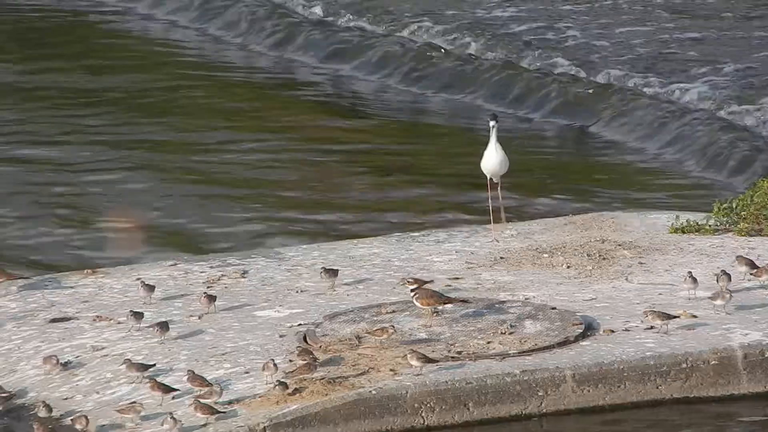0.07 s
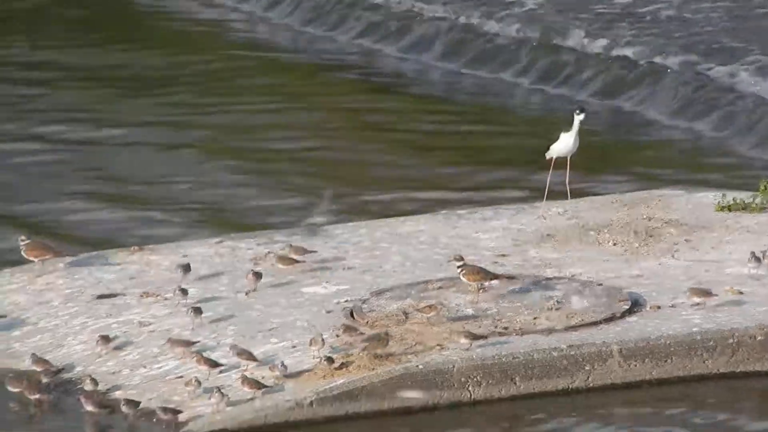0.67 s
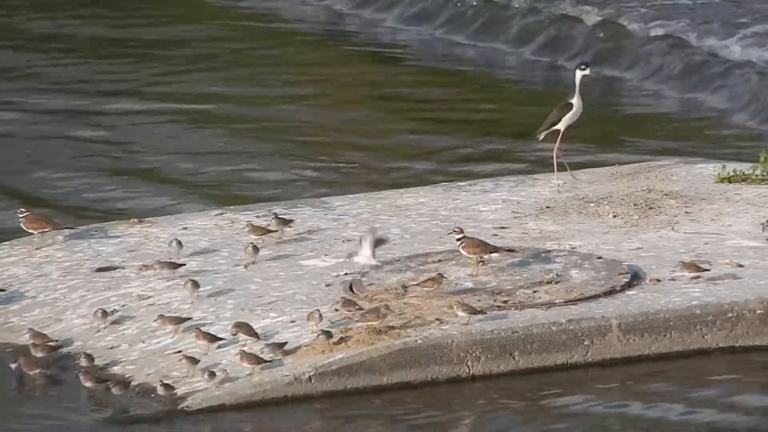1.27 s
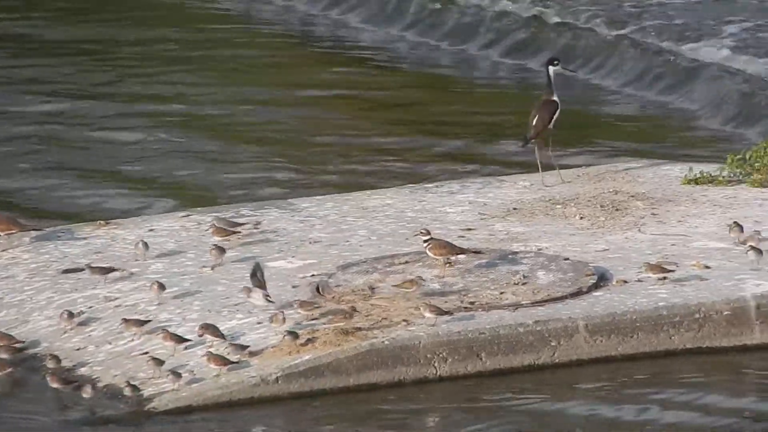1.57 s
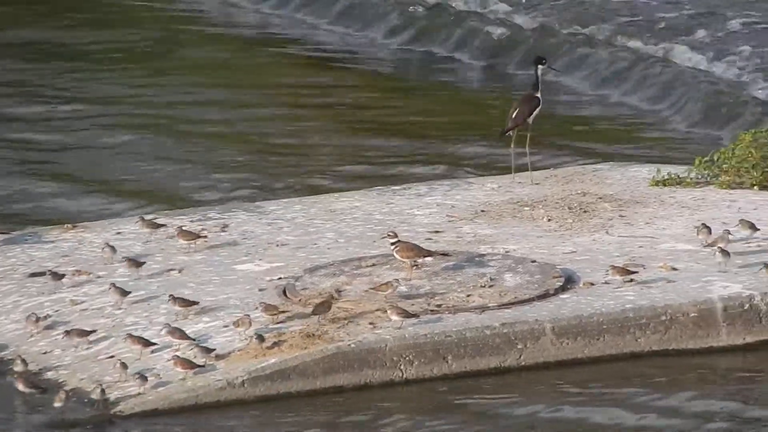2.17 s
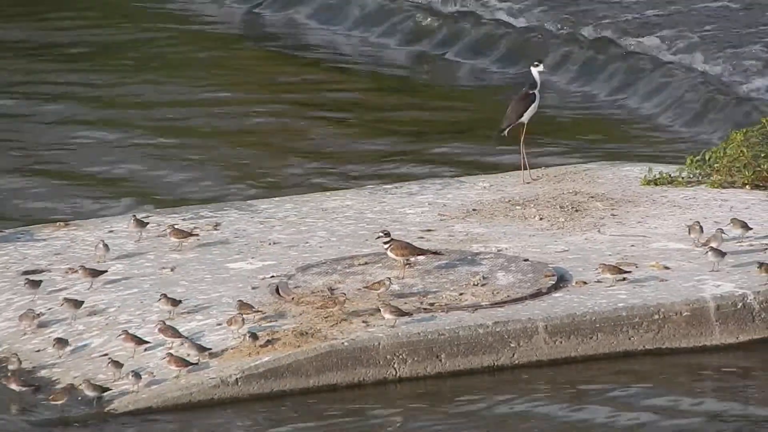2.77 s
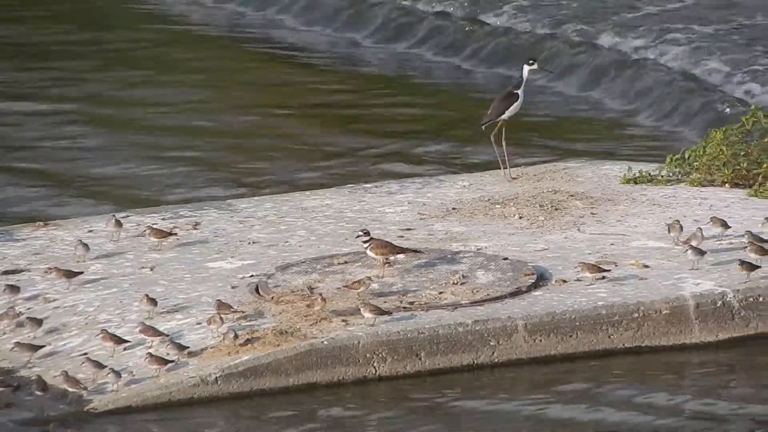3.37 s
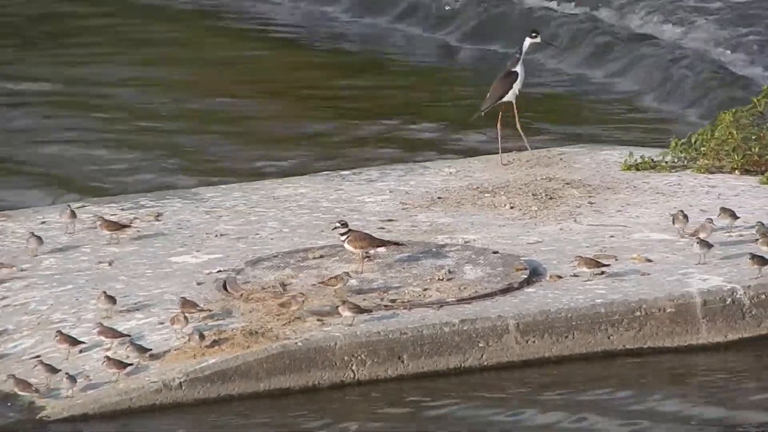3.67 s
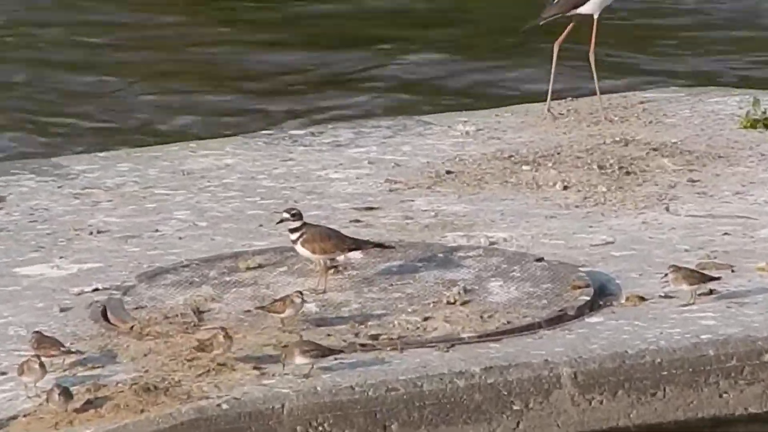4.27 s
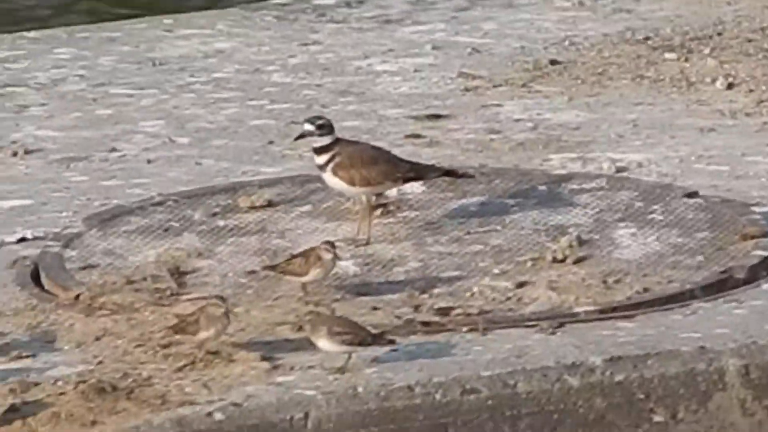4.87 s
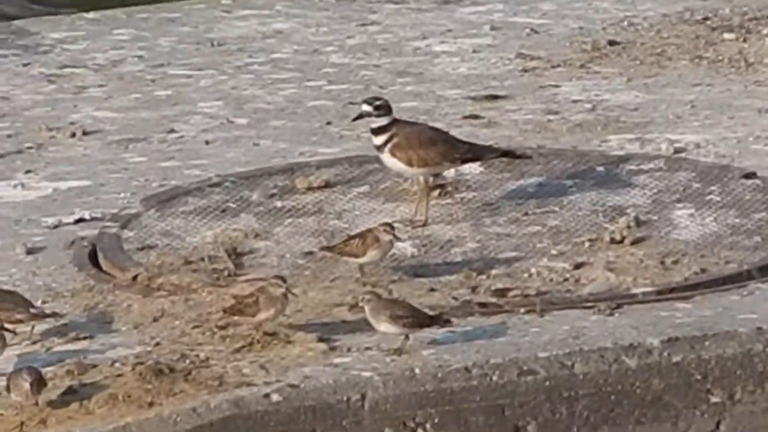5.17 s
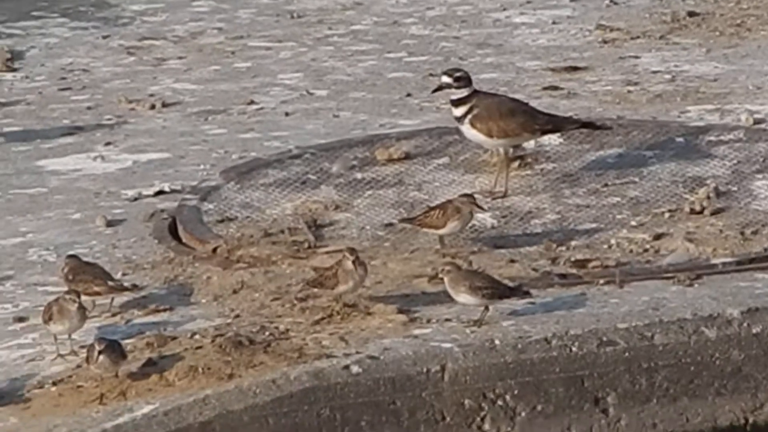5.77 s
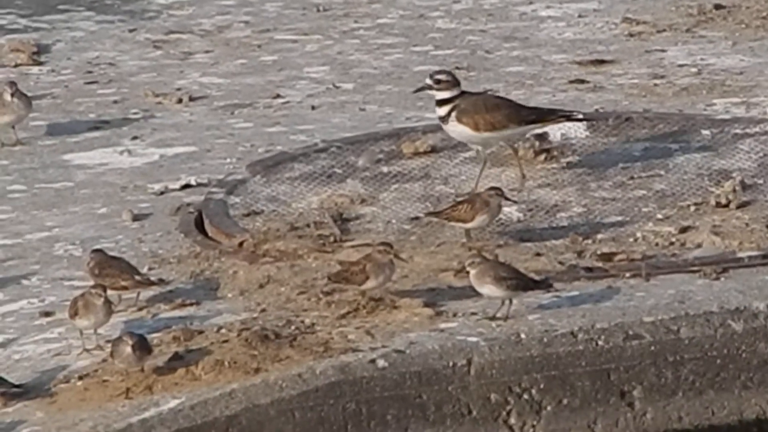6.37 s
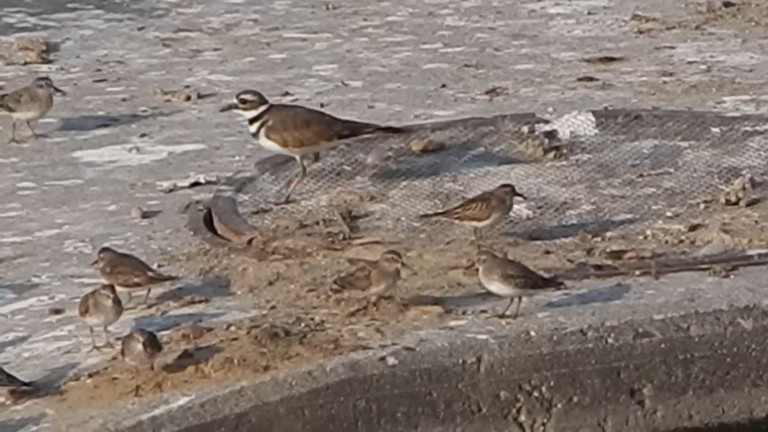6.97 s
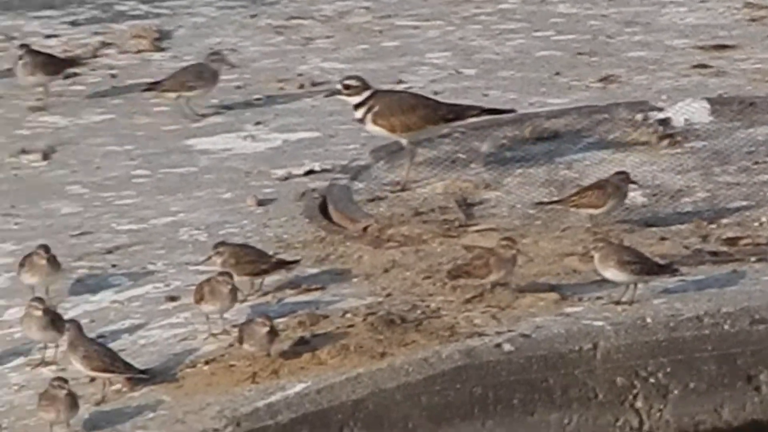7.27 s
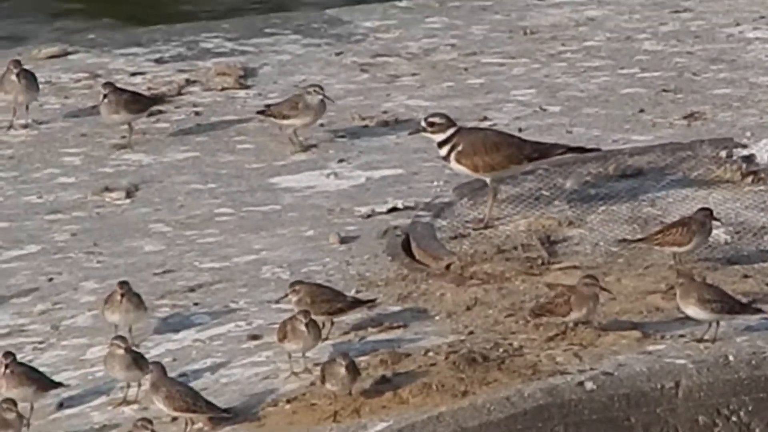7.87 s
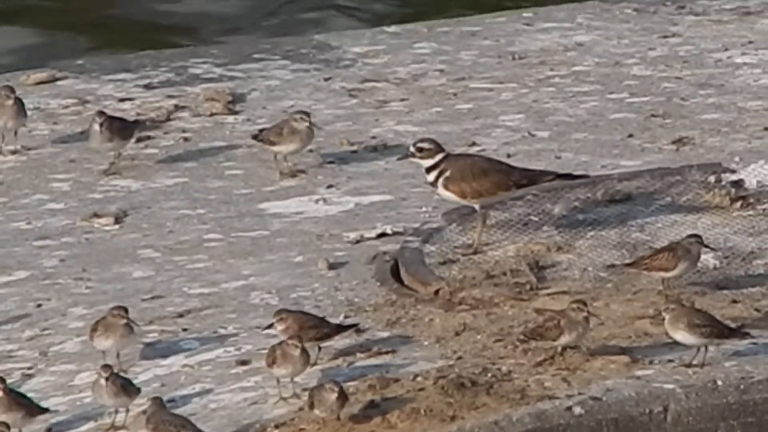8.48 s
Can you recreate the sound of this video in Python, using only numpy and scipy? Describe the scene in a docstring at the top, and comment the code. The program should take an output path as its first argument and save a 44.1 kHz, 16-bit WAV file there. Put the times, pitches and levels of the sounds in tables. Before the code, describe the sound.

River water roars and bubbles steadily over a low weir, with a fine hiss on top and distant traffic rumbling underneath. A truck drones past early, then car engines hum by while small shorebirds give a few faint, high chips. About halfway, the handled camera makes one sharp click on the right, and everything drops in volume for a moment before swelling back.

```python
"""River weir near a road

Water roars and bubbles over a low weir. Traffic rumbles beyond it and a fine hiss lies on top.
A truck drones past, car engines slow down and pull away, and small shorebirds chip faintly.
A camera is handled: its body ticks softly, then gives one sharp click that makes its
automatic volume control turn everything down for a moment."""
import sys
import numpy as np
from scipy import signal
from scipy.fft import rfft, irfft
from scipy.io import wavfile
from scipy.ndimage import uniform_filter1d

SR = 44100
rng = np.random.default_rng(int(sys.argv[2]) if len(sys.argv) > 2 else 0)


def to_wav(sig):
    """Store sig (one row per channel, or 1-D mono) as 16-bit WAV at the path in sys.argv[1].

    Samples outside -1..1 are clipped; the rate is SR.
    """
    pcm = np.clip(np.atleast_2d(sig), -1, 1) * 32767
    pcm = np.round(pcm).astype(np.int16)
    wavfile.write(sys.argv[1], SR, pcm.T)  # frames by channels


N = 375291
TIME = np.arange(N) / SR

# How strong each noise is from low to high: frequency_hz, relative_db
WEIR_SPECTRUM = [(280, -9), (480, -4), (562, -7.5), (795, -0.5), (1270, -2), (1970, -9), (2310, -14.5),
                 (2500, -14.5), (2670, -16.5), (4230, -27.5), (7000, -40.5), (9100, -58), (15400, -120)]
TRAFFIC_SPECTRUM = [(12, -50), (28, -39), (45, -8.5), (65, -6.5), (97, 0.5), (130, -2.5), (189, -6),
                    (233, -10), (287, -21.5), (321, -19.5), (358, -13), (379, -11), (418, -10.5),
                    (560, -22), (730, -27), (1230, -120)]
HISS_SPECTRUM = [(3240, -2), (5500, -2), (7320, 0), (8560, 0.5), (11000, 0.5), (11800, -2.5), (15500, -16)]
# Moments when each noise grows a little louder: peak_s, half_width_s, rise_db
WEIR_RISES = [(0.35, 0.24, 1.2), (1.3, 1.0, 0.76), (7.3, 1.0, 0.9)]
TRAFFIC_RISES = [(1.0, 1.7, 1.5), (5.3, 0.19, 0.83), (8.3, .35, 1.7)]
HISS_RISES = [(1.4, 1.4, 2.5), (6.5, 0.62, 4.6), (7.8, 3.7, 2.4)]
# How alike the noise is on the left and right: frequency_hz, likeness (1 is alike, 0 is unrelated)
STEREO_LIKENESS = [(60, 0.97), (140, 1), (340, 0.93), (860, 0.82), (1380, 0.55), (1900, 0.28),
                   (2900, -0.01), (4000, -0.32), (5500, -0.26), (9000, -0.041)]
# Which side the noise is louder on: frequency_hz, left_minus_right_db
STEREO_BALANCE = [(100, -1), (1500, -0.64), (4500, -1.4), (8000, -2), (14000, -2)]
# The tones in an engine's hum: multiple_of_firing_rate, relative_db
TRUCK_HARMONICS = [(2, -1.5), (3, -1), (4, -3.5), (5, -4.5), (7, 1.5), (8, -7.5), (9, -6)]
CAR_HARMONICS = [(1, 0), (2, -25)]
# Passing cars: start_s, end_s, first_hz, last_hz, loudest_s, level_db, half_width_s, wobble_share
CAR_PASSES = [(0.5, 2.5, 96.6, 105.8, 1.97, -22.5, 0.23, 0.031),
              (2.8, 4.4, 159, 131.6, 2.75, -29, 0.46, 0.011),
              (3.6, 4.6, 99.8, 109.7, 4.3, -23, 0.35, 0.032),
              (4.9, 6.8, 129.2, 157.3, 6.31, -17.5, 0.4, 0.0027),
              (6.5, 7.9, 356.1, 358.5, 7.3, -34.5, .6, 0.0028)]
# Short shorebird calls: time_s, relative_db, strongest_harmonic_hz
BIRD_CHIPS = [(2.805, -41, 5070), (3.6456, -42, 5110), (5.2734, -38, 4650), (5.9668, -38, 5000),
              (6.8613, -39, 5110), (7.3694, -40, 5170)]
# Clicks of the handled camera: start_s, right_db, right_minus_left_db, brightness_db_per_octave
CAMERA_CLICKS = [(3.4167, -20.5, 6, 2), (3.429, -28, 4, 4), (4.5724, -1.5, 10, 1), (4.575, -12, 9, 3)]
# The tones the camera body rings with: pitch_hz, relative_db, ring_s (time to fade by 60 dB)
CAMERA_TONES = [(1880, -5, .03), (2170, -2, 0.012), (3070, -3.5, 0.013), (4100, -6, .01),
                (7400, -13.5, .01), (9400, -13, .008), (10700, -5.5, 0.0053), (11900, -4, 0.0058),
                (14400, -21, .005)]


def gain_of(db):
    """Turn decibels into a number to multiply a sound by."""
    return 10 ** (np.asarray(db) / 20)


def unit_level(x):
    """Scale a signal so its average strength (rms) is 1."""
    return x / np.sqrt(np.mean(x ** 2) + 1e-20)


def look_up(table, hz):
    """Read between a table's rows, giving each octave equal room."""
    row_hz, values = np.transpose(table)
    return np.interp(np.log(hz + 1), np.log(row_hz + 1), values)


def add(mix, start_s, sound):
    """Add a stereo sound to the mix at the given time."""
    part = mix[:, round(start_s * SR):][:, :sound.shape[1]]
    part += sound[:, :part.shape[1]]


def drift(rate_hz):
    """A smooth random curve that changes about rate_hz times a second."""
    hz = np.fft.rfftfreq(N, 1 / SR)
    return unit_level(irfft(rfft(rng.standard_normal(N)) * np.exp(-(hz / rate_hz) ** 2), N))


def swelling(rises, base_db):
    """Volume over time: a steady level with a few smooth rises."""
    rise_db = sum(db * np.exp(-((TIME - peak_s) / width_s) ** 2) for peak_s, width_s, db in rises)
    return gain_of(base_db + rise_db)


def wide_noise(spectrum, patchy_db, flicker_db, frame_size):
    """Stereo noise whose level wavers, both in small patches of frequency and as a whole."""
    hz = np.fft.rfftfreq(frame_size, 1 / SR)
    hop = frame_size // 4
    frames = N // hop + 5
    a, b, c, d, patches = rng.standard_normal((5, frames, len(hz)))
    patches = uniform_filter1d(patches, size=10, axis=0)
    patches = unit_level(uniform_filter1d(patches, size=7, axis=1))
    flicker = unit_level(uniform_filter1d(rng.standard_normal((frames, 1)), size=6, axis=0))
    likeness = np.clip(look_up(STEREO_LIKENESS, hz), -1, 1)
    left, unrelated = a + 1j * b, c + 1j * d
    right = likeness * left + np.sqrt(1 - likeness ** 2) * unrelated
    right /= gain_of(look_up(STEREO_BALANCE, hz))
    shape_db = look_up(spectrum, hz) + patchy_db * patches + flicker_db * flicker
    bands = np.array([left, right]) * gain_of(shape_db)
    _, noise = signal.istft(bands.transpose(0, 2, 1), nperseg=frame_size, noverlap=frame_size - hop)
    return noise[:, :N] / np.std(noise[:, :N].mean(0))


def weir():
    """Falling water blends into a roar, with single bubbles ringing in it."""
    roar = wide_noise(WEIR_SPECTRUM, patchy_db=0.78, flicker_db=0.33, frame_size=1024)
    fizz = bubbles(per_s=980, spread_db=1.5, db_per_octave=-4.5, cycles=11.5) * gain_of(-20.4)
    return (roar + fizz) * swelling(WEIR_RISES, base_db=-23.5)


def bubbles(per_s, spread_db, db_per_octave, cycles):
    """Each bubble rings briefly and rises in pitch; the small, high ones are the faintest."""
    out, pitches = np.zeros((2, N)), np.geomspace(700, 5500, 24)
    count = int(per_s * N / SR / len(pitches))
    for hz in pitches:
        turns = np.arange(int(3 * cycles * SR / hz)) * hz / SR
        fade = np.exp(-2 * turns / cycles) * (1 - np.exp(-turns))
        ring = np.sin(2 * np.pi * turns * (1 + 0.042 * turns / cycles)) * fade
        when, side, chance = rng.random((count, 3)).T
        extra_db = spread_db * np.minimum(-np.log(1 - chance), 4)
        strength = gain_of(extra_db + db_per_octave * np.log2(hz / pitches[0]))
        starts = np.zeros((2, N))
        starts[:, (when * (N - 1)).astype(int)] = strength * np.sqrt([1 - side, side])
        out += signal.oaconvolve(starts, ring[None], axes=1)[:, :N]  # one ring at every start
    return unit_level(out)


def traffic():
    """Many distant vehicles blend into one low rumble."""
    rumble = wide_noise(TRAFFIC_SPECTRUM, patchy_db=1.0, flicker_db=1.1, frame_size=4096)
    rumble *= swelling(TRAFFIC_RISES, base_db=-22)
    return signal.sosfilt(signal.butter(4, 38, "high", fs=SR, output="sos"), rumble)


def hiss():
    """A faint, fine hiss that slowly swells and sinks."""
    noise = wide_noise(HISS_SPECTRUM, patchy_db=1.5, flicker_db=0.63, frame_size=1024)
    return noise * swelling(HISS_RISES, base_db=-51.5)


def engine(firing_hz, harmonics, waver_db, wobble):
    """An exhaust hums at multiples of the engine's firing rate, each tone wavering on its way."""
    turns = np.cumsum(firing_hz * (1 + wobble * drift(16.2))) / SR
    hum = np.zeros(N)
    for multiple, db in harmonics:
        strength = gain_of(db + waver_db * drift(2.7))
        hum += strength * np.sin(2 * np.pi * (multiple * turns + rng.random()))
    return np.sqrt(2) * hum


def passing(loudest_s, level_db, half_width_s):
    """Volume of a vehicle on a straight road: twice as far away is half as strong."""
    return gain_of(level_db) / np.hypot(1, (TIME - loudest_s) / half_width_s)


def truck():
    """A drone, loudest as it approaches, whose pitch sinks as it goes by (the Doppler effect)."""
    along_road = (TIME - 1.7) / 0.85  # zero when the truck is straight ahead
    firing_hz = 51.5 * (1 - 0.043 * along_road / np.hypot(1, along_road))
    drone = engine(firing_hz, TRUCK_HARMONICS, waver_db=1.5, wobble=0.002)
    return drone * passing(loudest_s=1.19, level_db=-27, half_width_s=0.3)


def car(start_s, end_s, first_hz, last_hz, loudest_s, level_db, half_width_s, wobble):
    """A passing engine changes speed, quickly at first and then more gently."""
    settle_s, fade_s = 1.587, 0.094
    eased = 1 - np.exp(-np.clip(TIME - start_s, 0, end_s - start_s) / settle_s)
    firing_hz = first_hz + (last_hz - first_hz) * eased / eased[-1]
    fade = np.clip(np.minimum(TIME - start_s, end_s - TIME) / fade_s + 0.5, 0, 1)
    hum = engine(firing_hz, CAR_HARMONICS, waver_db=1.14, wobble=wobble)
    return hum * fade * passing(loudest_s, level_db, half_width_s)


def shorebirds(length_s, arch, neighbour_db, rasp):
    """Each chip rises and falls in pitch: one strong tone between two weaker ones."""
    out, progress = np.zeros((2, N)), np.linspace(-1, 1, int(length_s * SR))
    fade = np.cos(np.pi * progress / 2) ** 2
    for time_s, db, hz in BIRD_CHIPS:
        wobble = unit_level(uniform_filter1d(rng.standard_normal(len(progress)), size=60))
        turns = np.cumsum(hz * (1 - arch * progress ** 2 + rasp * wobble)) / SR
        lag = np.array([[0], [rng.uniform(-0.21, 0.34)]])  # gives the bird a direction
        phase = 2 * np.pi * (turns + lag) / 4  # hz is the fourth harmonic
        chip = sum(gain_of(neighbour_db * abs(k - 4)) * np.sin(k * phase) for k in (3, 4, 5))
        add(out, time_s - length_s / 3, gain_of(db - 4.5) * chip * fade)
    return out


def camera_clicks():
    """Each click makes the camera body ring and its loose parts buzz briefly."""
    out, t = np.zeros((2, N)), np.arange(SR // 16) / SR
    # The left microphone is farther away and shielded by the body, so it hears a later, duller ring.
    delay_s, dulling_db_per_octave = np.array([[0.00012], [0]]), np.array([[3.5], [0]])
    buzz_band = signal.butter(4, [1700, 12500], "band", fs=SR, output="sos")
    onset = 1 - np.exp(-t / 0.0004)
    for start_s, right_db, left_drop_db, brightness in CAMERA_CLICKS:
        ring = np.zeros((2, len(t)))
        for hz, db, ring_s in CAMERA_TONES:
            tone_db = db + (brightness - dulling_db_per_octave) * np.log2(hz / 5000)
            ring += gain_of(tone_db - 60 * t / ring_s) * np.sin(2 * np.pi * hz * (t - delay_s))
        buzz = unit_level(signal.sosfilt(buzz_band, rng.standard_normal((2, len(t)))))
        buzz *= gain_of(-18.5 - 60 * t / 0.07)
        add(out, start_s, (ring + buzz) * onset * gain_of([[right_db - left_drop_db], [right_db]]))
    return out


def volume_control(x, threshold_db, recovery_db_per_s):
    """A sharp peak pulls the volume down at once, and then it creeps back up."""
    treble = np.diff(x, prepend=0)  # the control reacts mostly to high sounds
    power = uniform_filter1d((treble ** 2).mean(0), size=64)
    treble_db = 10 * np.log10(abs(power) + 1e-12)
    recovery_db = TIME * recovery_db_per_s
    held_peak_db = np.maximum.accumulate(treble_db + recovery_db) - recovery_db
    cut_db = np.maximum(held_peak_db - threshold_db, 0)
    smooth_cut_db = signal.lfilter([1 / 64], [1, 1 / 64 - 1], cut_db)
    return x / gain_of(smooth_cut_db)


def scene():
    """Mix the hiss, water, road, birds and camera clicks."""
    background = hiss() + weir() + traffic()
    engines = truck() + sum(car(*row) for row in CAR_PASSES)
    engines = engines * gain_of([[-0.45], [0.45]])  # a little to the right
    birds = shorebirds(length_s=0.0304, arch=0.113, neighbour_db=-7.5, rasp=0.024)
    return background + engines + birds + camera_clicks()


def record(dry):
    """Control the volume, cut two narrow bands, fade in quickly and remove the highest treble."""
    x = volume_control(dry, threshold_db=-23.5, recovery_db_per_s=15.5)
    for hz in (2500, 7500):
        x = signal.lfilter(*signal.iirnotch(hz, hz / 110, fs=SR), x)
    fade_in = gain_of(np.interp(TIME, [0.11, 0.14, 0.156, 0.25], [-100, -35, -2.5, 0]))
    low_pass = signal.firwin(511, cutoff=15700, window=("kaiser", 9), fs=SR)
    return signal.oaconvolve(x * fade_in, low_pass[None], "same")


dry = scene()
out = record(dry)
to_wav(out)
```